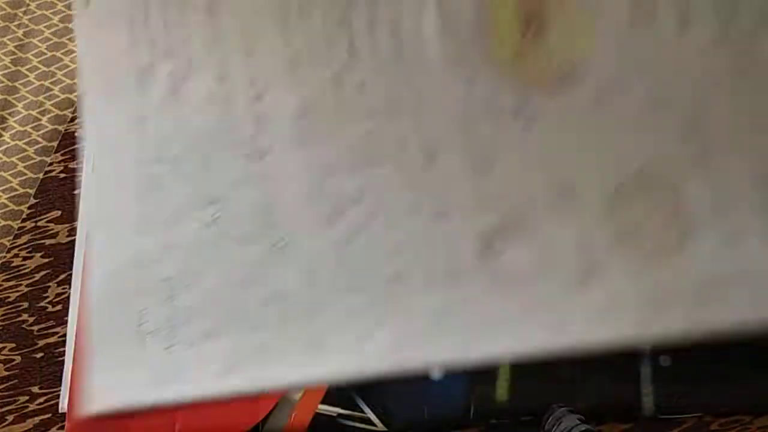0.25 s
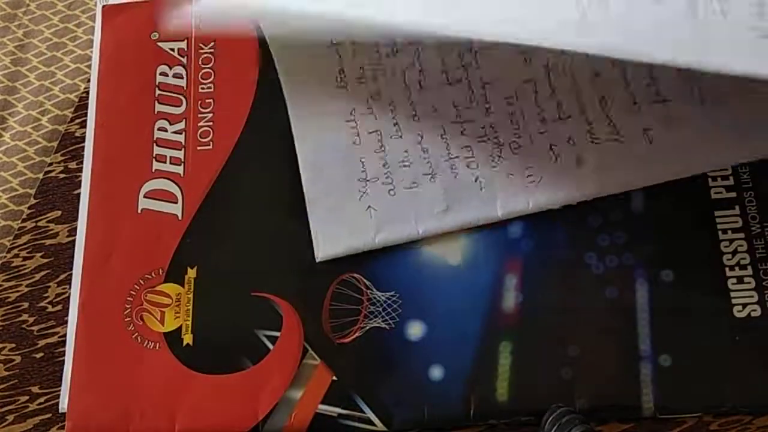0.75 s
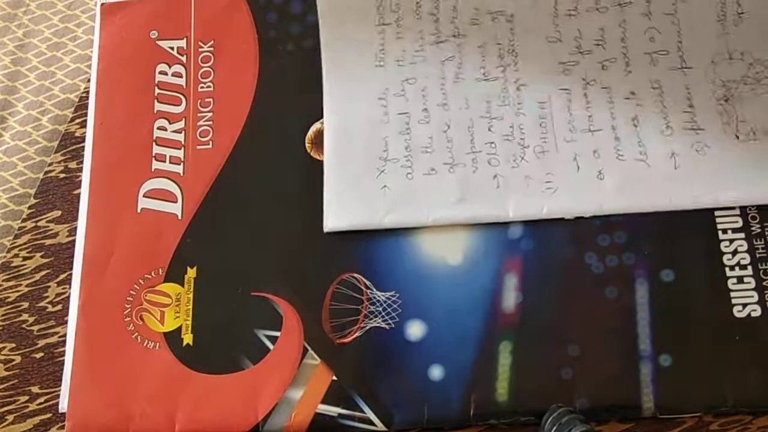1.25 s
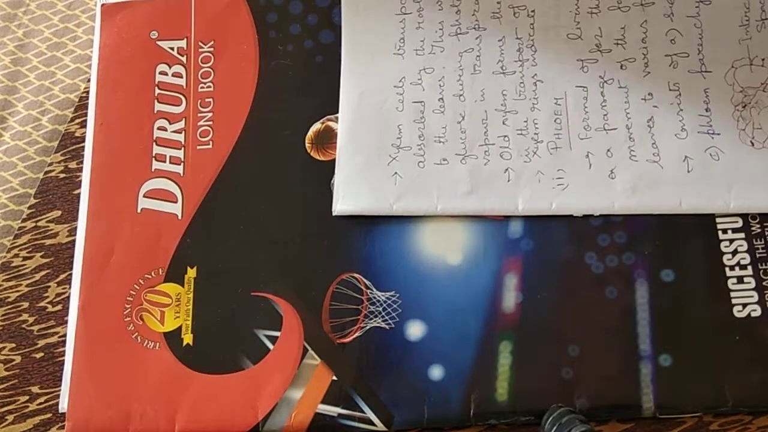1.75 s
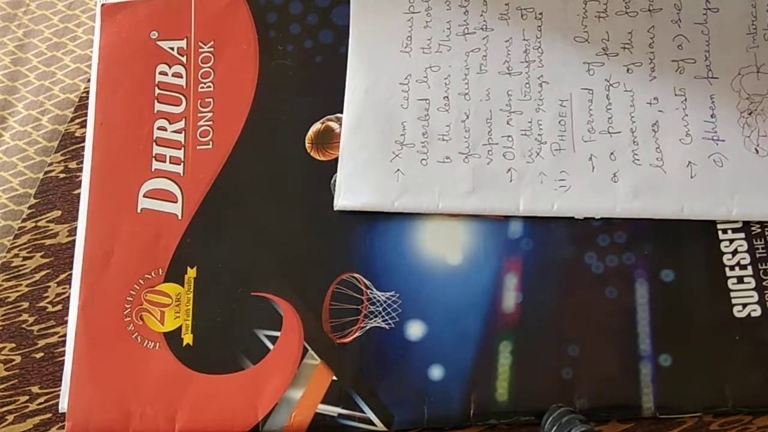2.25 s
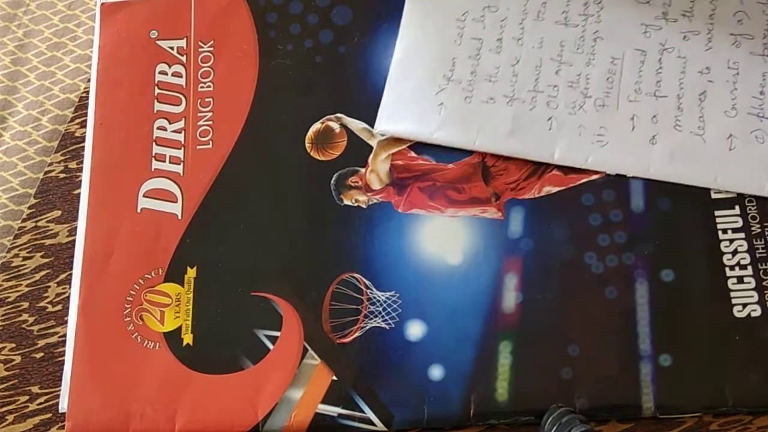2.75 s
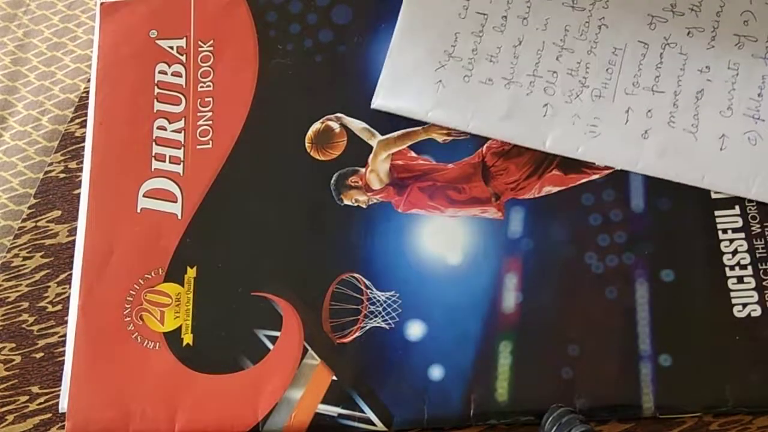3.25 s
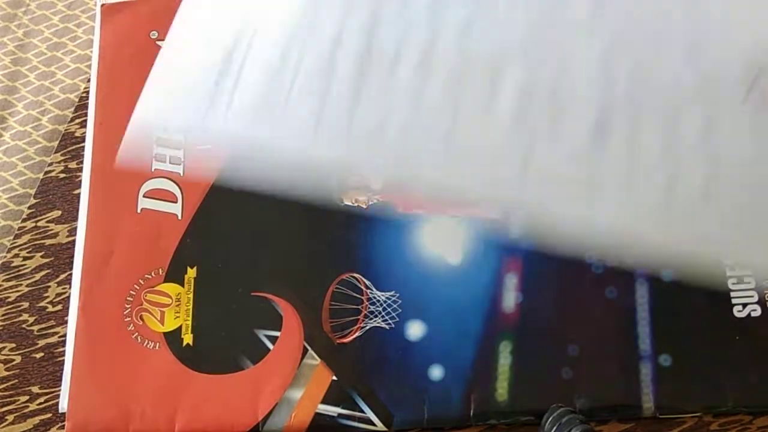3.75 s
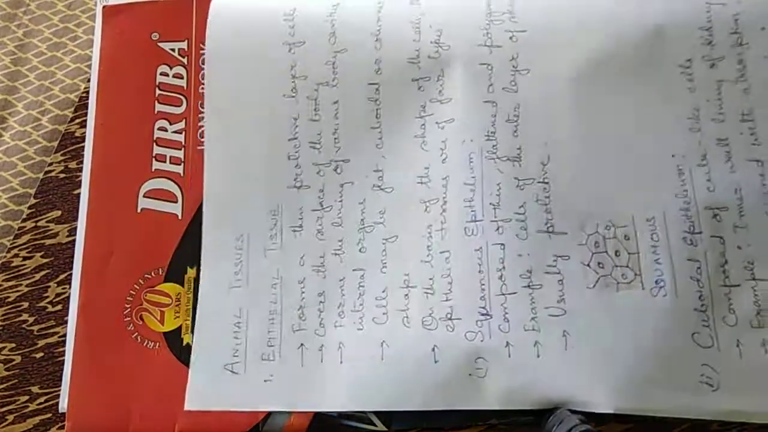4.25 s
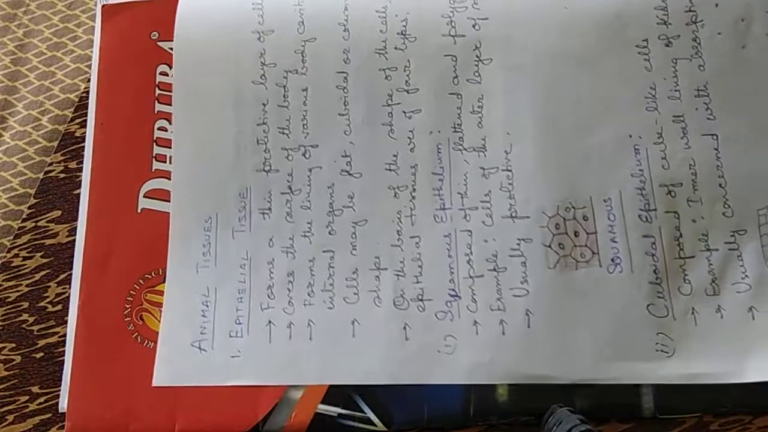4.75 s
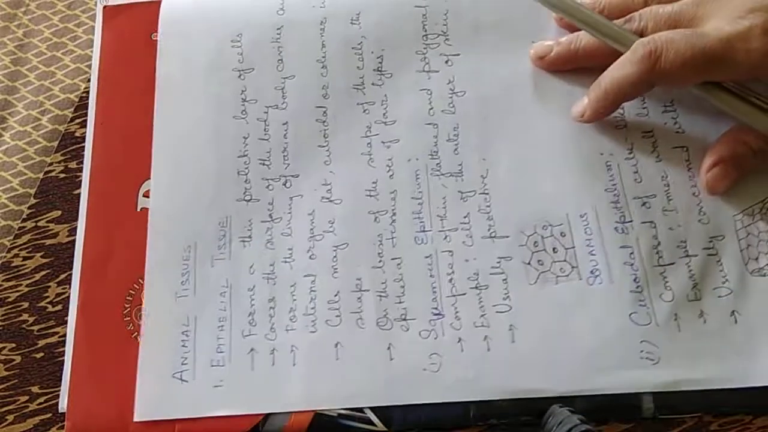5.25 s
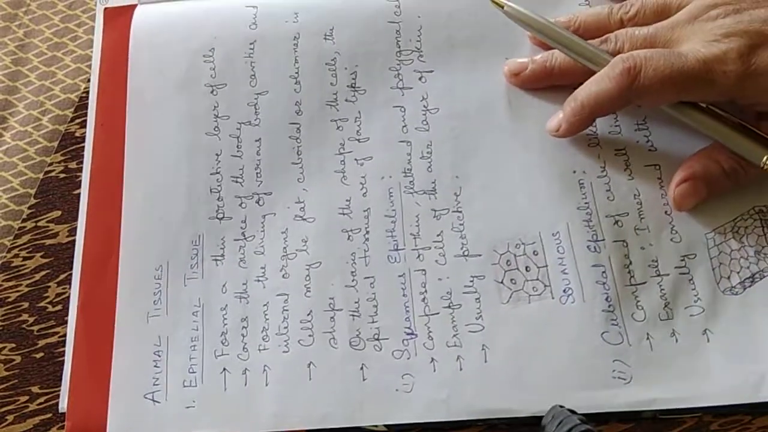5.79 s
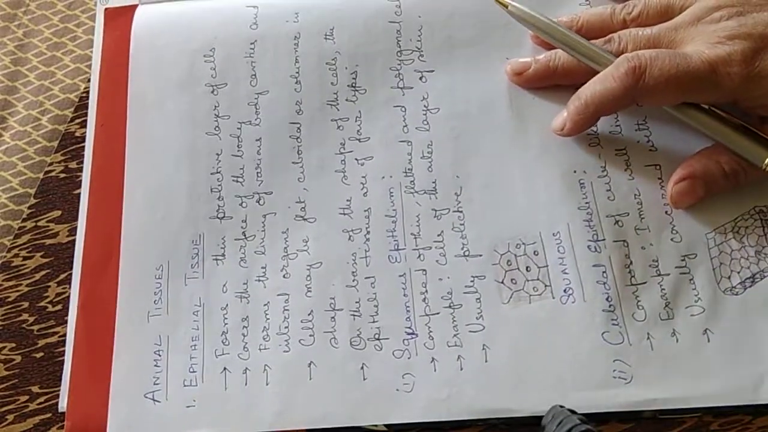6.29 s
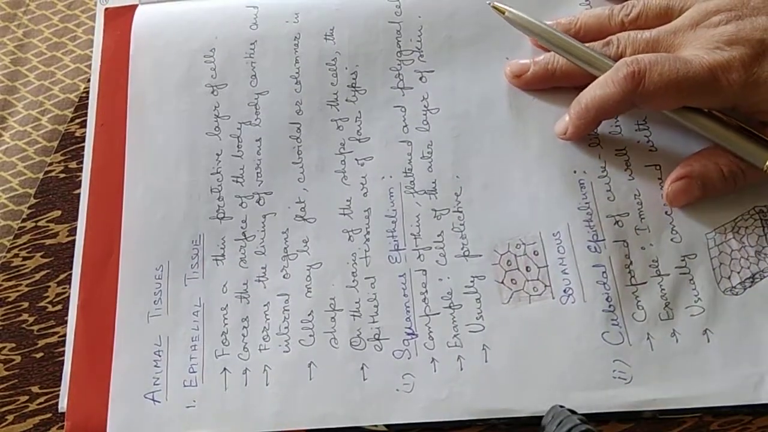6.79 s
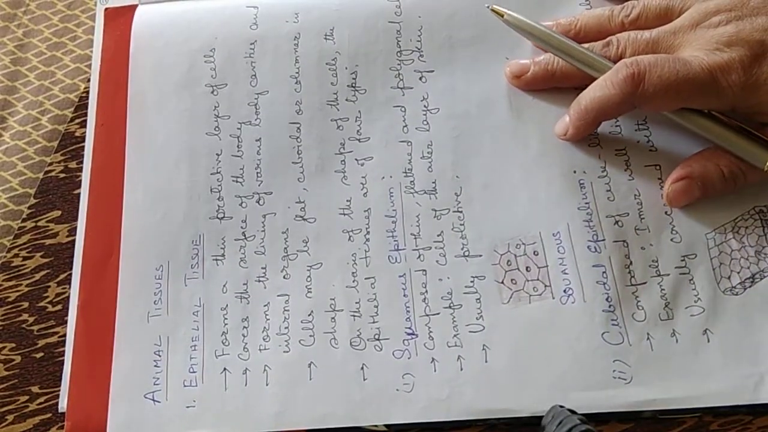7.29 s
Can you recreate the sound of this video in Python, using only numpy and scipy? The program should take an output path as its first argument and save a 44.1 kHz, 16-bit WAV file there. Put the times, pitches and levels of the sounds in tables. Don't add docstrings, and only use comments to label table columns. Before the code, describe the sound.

A small quiet room with a faint, steady low fan hum that thins toward the end, heard on a close stereo phone microphone. From 0 to 0.8 s a paper sheet swishes and scrapes, with small snaps and corner flicks. Between 0.8 and 1.6 s it flaps and pops dully on the notebook cover, then nearly rests until 2.4 s. A crease snaps at 2.5 s and a bright cluster of flicks bursts at 2.8 s. After lighter rustle, the sharpest cracks come at 3.4-3.7 s, followed by sweeping and soft pops to 4.4 s. A crisp flip at 4.56 s leads to smoothing slides around 5 s. A wooden tap at 5.57 s precedes rapid high pen ticks and a tiny squeak near 5.85 s. Soft rubbing continues; a stronger distant wood knock lands at 6.56 s, with lighter ones after. Around 7.1 s a thin metal clip shimmers faintly, then tiny ticks and low bumps finish by 7.5 s.

```python
import sys
import numpy as np
from scipy import signal
from scipy.fft import rfft, irfft, next_fast_len
from scipy.io import wavfile
from scipy.ndimage import uniform_filter1d, minimum_filter1d

SR = 44100
rng = np.random.default_rng(int(sys.argv[2]) if len(sys.argv) > 2 else 0)


def unload_wav(signal):
    wavfile.write(
        sys.argv[1],
        SR,
        np.round(np.clip(np.atleast_2d(signal).T, -1, 1) * 32767).astype(np.int16),
    )


def invert_db(x):
    u = np.asarray(x, float) / 20
    return 10 ** u


N = 332073
T = np.arange(N) / SR
PORT_LAG = 7
APART_HZ = 900


def level(x, db):
    return x * invert_db(db) / np.sqrt(np.mean(x ** 2) + 1e-30)


def colour(x, points):
    hz, db = np.transpose(points)
    size = next_fast_len(x.shape[-1])
    log_hz = np.log(np.arange(size // 2 + 1) * SR / size + 1)
    gain = invert_db(np.interp(log_hz, np.log(hz), db))
    return irfft(rfft(x, size) * gain, size)[..., :x.shape[-1]]


def band(x, lo_hz, hi_hz):
    sos = signal.butter(2, [lo_hz, min(hi_hz, .45 * SR)], "band", fs=SR, output="sos")
    return signal.sosfilt(sos, x)


def walk(rate):
    k = int(SR / rate)
    held = np.repeat(rng.standard_normal(N // k + 1), k)
    return 0.97 * uniform_filter1d(held, k)[:N]


def ports(alike, size):
    noise = rng.standard_normal((3, size))
    shared = np.array([noise[0], np.roll(noise[0], PORT_LAG)])
    return np.sqrt(alike) * shared + np.sqrt(1 - alike) * noise[1:]


def bass_alike(pair, hz):
    apart = np.clip(hz / APART_HZ, .3, 1)
    return np.array([pair[0], np.sqrt(1 - apart ** 2) * pair[0] + apart * pair[1]])


def sides(pan_db):
    return invert_db(np.array([[pan_db], [-pan_db]]) / 2)


def add(out, s, x):
    i = int(s * SR)
    out[:, i:i + x.shape[1]] += x[:, :N - i]


# pitch in Hz, time to fade by 60 dB in seconds.
ROOM_FADE = [(150, 0.43), (1000, 0.31), (4000, 0.25), (12000, 0.14)]


def room(x):
    first_wall_s = 0.00614
    t = np.arange(SR // 2) / SR
    hz, t60 = np.transpose(ROOM_FADE)
    tail = 0
    for f in 125 * 2. ** np.arange(8):
        octave = band(bass_alike(rng.standard_normal((2, len(t))), f), f / 1.41, f * 1.426)
        tail = tail + octave * invert_db(-60 * t / np.interp(np.log(f), np.log(hz), t60))
    tail = tail * np.clip((t - first_wall_s) / 0.00057, 0, 1)
    tail = tail / np.sqrt(np.sum(tail ** 2) / 2)
    return signal.fftconvolve(x, tail, axes=1)[:, :N]


# pitch in Hz, strength in dB per Hz.
FAN_TONE = [(15, -71), (25, -31), (69, -26.5), (83, -29.5), (105, -8.5), (168, -5), (220, -1.5),
            (366, -13.5), (425, -15), (472, -22.5), (697, -58.5), (900, -26), (1170, -47), (1980, -120)]
# time in seconds, level in dB.
FAN_LOUDNESS = [(0.0, -47), (0.55, -49), (1.42, -50), (1.82, -50), (2.24, -50.5), (2.58, -51), (2.95, -51),
                (3.4, -52.5), (3.75, -53), (3.92, -53.5), (5.26, -54.5), (5.51, -56.5), (5.64, -60.5),
                (6.77, -52), (7.07, -58), (7.32, -63), (7.53, -63)]


def fan():
    air = ports(0.95, N)
    hum = level(colour(air, FAN_TONE), -4.0) + level(band(air, 212.5, 237.6), -11.5)
    hum_db = np.interp(T, *np.transpose(FAN_LOUDNESS)) + 0.26 * walk(25)
    return hum * invert_db(hum_db) * sides(-0.84)


def ring(modes, seconds):
    swell_cycles = 2.2
    t = np.arange(int(seconds * SR)) / SR
    total = 0
    for hz, db, t60 in modes:
        phase = 0.2 * bass_alike(rng.standard_normal((2, 1)), hz)
        swell = 1.25 - np.exp(-t * hz / swell_cycles)
        total = total + invert_db(db - 60 * t / t60) * swell * np.sin(2 * np.pi * (hz * t + phase))
    return total


# pitch in Hz, level in dB, time to fade by 60 dB in seconds.
SHELF_RING = [(350, -0.5, 0.089), (534, -13, 0.22), (750, -9, 0.18), (876, -8, 0.082), (1030, -2, 0.066),
              (1144, -6.5, 0.36), (1390, 8, 0.033), (1532, 3, 0.056), (1459, 0.5, 0.14), (1740, -13, 0.17),
              (1680, 3.5, 0.088)]
CHEST_RING = [(237, -9, .22), (328, -1, .24), (442, -3, .3), (531, -12, .2), (608, -15, .25),
              (770, -8, .19), (920, -13, .15), (1058, -3, .17), (1228, -5, .17), (1455, -5, .13),
              (1595, -2, .13), (1826, -4, .14), (2480, -8, .07), (2740, -11, .15), (3128, -9, .15)]
LID_RING = [(940, -8, .12), (1211, -8, .15), (1340, -5, .05), (1536, -4, .2), (1653, -6, .18),
            (1980, -3, .04), (2300, -5, .05)]
# time in seconds, peak in dB, left minus right in dB.
FAR_KNOCKS = [
    (5.568, -26, 0.4),
    (6.561, -17.5, -0.24),
    (6.732, -31, -0.83),
    (6.642, -38.5, 0),
]


def knocks():
    woods = SHELF_RING, CHEST_RING, LID_RING, LID_RING
    cracks_db, tops_hz = (5.4, 8.0, 3.0, 4.5), (1900, 3400, 2600, 2100)
    out = np.zeros((2, N))
    for (s, db, pan_db), modes, crack_db, top_hz in zip(FAR_KNOCKS, woods, cracks_db, tops_hz):
        wood = ring([(hz, g, min(t60, .25)) for hz, g, t60 in modes], .5)
        t = np.arange(wood.shape[1]) / SR
        crack = band(rng.standard_normal(wood.shape), 810, top_hz) * invert_db(crack_db - 60 * t / 0.36)
        hit = band(band(wood + crack, 175, top_hz), 170, 6500)
        add(out, s + 0.0008, invert_db(db + 4.0) * hit / np.abs(hit).max() * sides(pan_db))
    return out


# time in seconds, peak in dB, pitch in Hz, time to fade by 60 dB in seconds.
SOFT_BUMPS = [
    (1.511, -51, 222, 0.08),
    (6.249, -42, 126, 0.14),
    (6.481, -46, 222, 0.091),
    (6.572, -38, 150, .12),
    (7.35, -35.5, 207, 0.03),
    (7.3952, -30.5, 170, 0.036),
]


def bumps():
    out, t = np.zeros((2, N)), np.arange(SR // 4) / SR
    for s, db, hz, t60 in SOFT_BUMPS:
        ease = np.sin(np.pi / 2 * np.clip(t * hz / 0.48, 0, 1)) ** 2
        note = invert_db(db - 1.0 - 60 * t / t60) * np.sin(2 * np.pi * hz * t) * ease
        add(out, s, np.ones((2, 1)) * band(note, 90, 900))
    return out


# start in seconds, end in seconds, pitch in Hz, width in Hz, level in dB.
RUBBED_NOTES = [
    (6.02, 6.17, 423, 22, -53),
    (5.9, 6.5, 440, 50, -62),
    (7.05, 7.3, 950, 500, -70),
    (6.882, 6.965, 338, 21, -43.5),
    (6.898, 7.035, 451, 23, -52),
    (7.428, 7.538, 350, 11, -64.5),
]
# start in seconds, end in seconds, pitch in Hz, width in Hz, level in dB.
HIGH_SQUEAKS = [
    (5.745, 5.785, 11700, 250, -53),
    (5.8355, 5.846, 11800, 600, -35),
    (5.842, 5.864, 11700, 400, -36),
    (5.86, 5.88, 11700, 700, -35),
    (5.875, 5.94, 11600, 400, -46),
]


def rubs():
    out = np.zeros((2, N))
    for start, end, hz, width_hz, db in RUBBED_NOTES + HIGH_SQUEAKS:
        size = int((end - start) * SR)
        noise = ports(0.87, size + SR // 4)
        note = band(noise, hz - width_hz / 2, hz + width_hz / 2)[:, -size:]
        add(out, start, level(note, db) * np.hanning(size) ** 0.4)
    return out


# pitch in Hz, width in Hz, level in dB.
CLIP_RING = [(6600, 40, -18), (7880, 27, -8), (9090, 35, -5), (9470, 40, -15), (10200, 34, -4),
             (11400, 36, -7), (12280, 97, -3), (12800, 60, -1), (14200, 500, 6), (15400, 250, -3)]


def metal():
    start_s, t60_s, clip_db = 7.111, 0.48, -52.5
    out, t = np.zeros((2, N)), np.arange(SR // 5) / SR
    noise = ports(0.41, SR // 2)
    tone = 0
    for hz, width, db in CLIP_RING:
        tone = tone + level(band(noise, hz - width / 2, hz + width / 2)[:, -len(t):], db)
    fade = np.clip(t / .012, 0, 1) * invert_db(-60 * t / t60_s) * np.clip((t[-1] - t) / .03, 0, 1)
    add(out, start_s, level(tone, clip_db) * fade)
    return out


def narrow_ticks(table, span):
    decay_s = 0.0013
    out, t = np.zeros((2, N)), np.arange(500) / SR
    for s, db, hz, pan_db in table:
        burst = ports(0.44, len(t)) * t / (t + 0.3 * decay_s) * np.exp(-t / decay_s)
        burst = band(band(burst, hz / span, hz * span), hz / span, hz * span)
        add(out, s, invert_db(db + 1.5) * burst / np.abs(burst).max(1).mean() * sides(pan_db))
    return out


# time in seconds, peak in dB, pitch in Hz, left minus right in dB.
PEN_TICKS = [
    (5.8363, -19.5, 11800, 6.5),
    (5.8382, -19, 11800, 7),
    (5.8432, -26, 11700, 7.5),
    (5.8625, -22, 11700, 9),
    (5.8645, -22, 11700, 7),
    (5.8672, -17, 11970, 5),
    (5.8705, -24, 11700, 4),
    (5.8725, -26, 12300, 6.5),
    (5.8752, -22.5, 12300, 5),
]


def pen():
    return narrow_ticks(PEN_TICKS, 1.05)


# time in seconds, peak in dB, pitch in Hz, left minus right in dB.
CORNER_PINGS = [(0.314, -27, 11950, 10), (.332, -33, 12500, 8), (.339, -29.5, 12500, 7),
                (.9381, -30, 12000, 4), (1.3539, -29, 13000, 3.5), (1.383, -40, 15000, 9),
                (2.737, -35.5, 14300, 7), (2.741, -31.5, 13800, 8), (2.746, -25, 13500, 6.5),
                (2.756, -29.5, 14600, 5.5), (2.7658, -22, 14500, 7), (2.7686, -22, 13000, 5.5),
                (2.771, -22.5, 11700, 3.5), (2.7755, -19.5, 12500, 7.5), (2.7792, -17, 14700, 7.5),
                (2.7835, -20.5, 13600, 7), (2.7925, -18, 14500, 9), (2.795, -15, 13500, 8.5),
                (2.797, -13.5, 14600, 9.5), (3.6443, -14.5, 12200, 5.5), (.687, -30, 4300, -10),
                (.755, -28.5, 3410, 1), (3.6548, -27, 4900, 1), (3.657, -27, 2900, -4),
                (4.084, -32.5, 1900, 2), (4.2963, -25, 2580, 3), (4.311, -34.5, 1900, 1),
                (4.316, -33, 2090, -2), (4.32, -35, 2200, 3), (7.3217, -36, 5940, 5),
                (4.701, -29, 11400, 2), (5.855, -34, 14300, 8.5), (5.868, -11, 13600, 6.5),
                (5.8684, -11.5, 10600, 6.5), (5.8905, -39, 6600, 3), (4.089, -34, 1150, 1),
                (.768, -36, 800, 3), (.777, -35.5, 900, 3), (7.317, -40, 6300, 5), (7.3295, -47, 5800, 3),
                (7.3432, -38, 5600, 6), (1.5045, -43, 7000, 3), (5.8844, -30.5, 12200, 5),
                (5.8894, -29.5, 13500, 6), (5.9381, -37, 12800, 5), (5.9423, -36.5, 13500, 8),
                (7.3035, -34.5, 12600, 2), (7.3064, -31, 12000, 4.5), (7.312, -40.5, 12500, 4),
                (7.317, -37.5, 12000, 4)]


def pings():
    return narrow_ticks(CORNER_PINGS, 1.146)


# time in seconds, edge in dB, thickness in dB, left minus right in dB.
EDGE_TICKS = [(0.229, -36.5, -13, 9.5), (0.4225, -18, -38, 12), (1.347, -29.5, -31, 9), (2.293, -31, -7, 0),
              (2.4646, -33, -11, 5), (2.6623, -31.5, -25, 1.5), (2.7424, -32, -10, 11.5),
              (2.7657, -25, -11.5, 10), (2.7985, -8, -20, 7.5), (.305, -24.5, -31, 2),
              (3.5808, -20.5, -14.5, -4.5), (3.647, -24, -15.5, 9), (5.537, -23, -34, -0.5),
              (5.836, -33, -14, 5), (5.867, -16, -18, 10.5), (.429, -25.5, -20, -6),
              (6.505, -30.5, -19, -6), (6.754, -25, -29, 5.5), (6.8896, -31, -17, -16.5),
              (7.3804, -31.5, -29, 2.5)]
# time in seconds, edge,
# crisp part and body in dB, left minus right in dB.
CREASE_FLIPS = [(.612, -23.5, -25.5, -28.5, -0.5), (0.6833, -27, -25, -39, 6.5),
                (0.6878, -34.5, -34, -34, 2), (.756, -36.5, -34, -39, 4), (2.4997, -13, -22, -40, 3),
                (2.44, -47, -47, -44.5, 0.5), (3.435, -16, -17.5, -30, 4), (3.446, -19, -33.5, -49, 2.5),
                (3.4867, -7.5, -17, -24, 7), (3.4897, -13, -16, -36, -4.5), (3.5214, -2.5, -12.5, -27, -1),
                (3.6555, -22.5, -36.5, -41, -3.5), (3.914, -18.5, -19, -25.5, 1.5),
                (4.0817, -44, -24, -25.5, -2.5), (4.204, -43, -33.5, -36, 0), (4.284, -51, -43, -37.5, -1),
                (4.296, -46, -33.5, -44, 3), (4.347, -49.5, -35, -40, 1.5),
                (4.5572, -20, -17.5, -31.5, 1.5), (2.8024, -25.5, -21.5, -34.5, 6.5),
                (4.9437, -39.5, -43, -67, -3), (5.026, -19, -24.5, -47, 0.5),
                (4.9997, -26.5, -24, -36.5, -2), (6.563, -25.5, -25.5, -17.5, 2.5),
                (6.7333, -50, -41, -47, -1.5), (7.293, -35.5, -46, -64, 1.5), (7.304, -35.5, -46, -63, 4),
                (7.3212, -28.5, -30, -50, -1.5), (7.343, -33, -39, -72, -1)]
# time in seconds, body in dB, edge in dB, left minus right in dB.
SHEET_POPS = [(0.171, -38.5, -49, -1), (.196, -45, -55.5, 0), (0.8, -40, -35.5, 2.5), (0.9661, -27, -26, 0),
              (1.206, -25, -40, 0.5), (1.32, -40, -49, 2.5), (1.394, -23.5, -16.5, -2.5),
              (1.5217, -27.5, -29, 0), (1.5962, -31, -53, 0.5), (1.759, -49, -50.5, 7),
              (1.8788, -50, -70, -6), (3.219, -41.5, -43, 4), (3.183, -39.5, -49, 6.5),
              (3.413, -30, -30, 0), (3.452, -41, -35, 2), (3.562, -32, -40.5, 0.5),
              (3.9736, -32.5, -35, -1.5), (4.047, -31.5, -38, 3.5), (4.146, -24.5, -35.5, 2),
              (5.928, -41.5, -55.5, -1), (5.934, -45, -55, 0), (7.07, -45, -65, -1), (6.873, -41, -60, 6),
              (6.965, -40, -60, 0), (7.402, -46, -65, 2), (6.632, -44, -31.5, 8)]


def burst(alike, decay_s):
    t = np.arange(800) / SR
    decay = np.exp(-t / decay_s) + .4 * np.exp(-t / (.3 * decay_s))
    return ports(alike, len(t)) * t / (t + .25 * decay_s) * decay


def snap(out, s, edge_db, crisp_db, body_db, hz, decay_s, pan_db):
    hz = hz * (1 + 0.028 * rng.standard_normal())
    top = burst(.3, 1.1 * decay_s)
    edge = band(top, 7100, 16100) + 1.1 * band(top, hz / 1.2, hz * 1.26)
    crisp = band(burst(.3, 1.2 * decay_s), 2900, 6050)
    body = band(burst(.8, 1.25 * decay_s), 410, 2110)
    total = 0
    for part, db in ((edge, edge_db + 2.0), (crisp, crisp_db + 0.5), (body, body_db + 3.0)):
        total = total + invert_db(db) * 1.22 * part / np.abs(part).max(1).mean()
    add(out, s + .0005, total * sides(pan_db))


def snaps():
    out = np.zeros((2, N))
    for s, edge_db, thick_db, pan_db in EDGE_TICKS:
        crisp_db = edge_db + thick_db
        snap(out, s, edge_db, crisp_db, crisp_db - 5.5, 11380, 0.00092, pan_db)
    for s, edge_db, crisp_db, body_db, pan_db in CREASE_FLIPS:
        snap(out, s, edge_db, crisp_db, body_db, 11130, 0.0012, pan_db)
    for s, body_db, edge_db, pan_db in SHEET_POPS:
        snap(out, s, edge_db, body_db - 7.5, body_db, 10600, 0.0012, pan_db)
    return out


# time in seconds, pressure in dB, rise and fall in seconds
# (each over 20 dB), slack in dB (how much the sheet flaps against the pressure).
SHEET_FLICKS = [(0.0, -35.5, 0.037, 0.052, -40), (.141, -43.5, 0.087, 0.13, -23),
                (0.801, -32.5, 0.18, 0.04, -9.5), (1.18, -37.5, 0.091, 0.13, -6.5),
                (1.41, -56, 0.032, 0.084, 13), (1.49, -44, 0.2, 0.071, -13), (1.54, -48.5, 0.12, 0.18, 1.5),
                (1.746, -52, 0.18, 0.097, -1.5), (2.19, -48, 0.092, 0.16, -3.5),
                (2.51, -40.5, 0.17, 0.28, -10.5), (2.6, -39, 0.25, 0.082, -7.5),
                (2.769, -29.5, .012, 0.13, -19), (2.797, -28, 0.066, 0.066, -15.5),
                (3.18, -44, 0.029, .5, -8), (3.235, -39, 0.066, 0.36, -18),
                (3.43, -34.5, 0.17, 0.28, -10.5), (3.49, -30.5, 0.22, 0.19, -19.5),
                (3.55, -52.5, 0.15, 0.44, 8), (3.64, -39, 0.037, 0.14, -1), (4.32, -50.5, 0.1, 0.13, 6.5),
                (4.563, -28, 0.072, 0.052, -7), (4.971, -37, 0.043, 0.18, -19),
                (5.01, -43, 0.066, 0.047, 3.5), (5.87, -39, 0.049, 0.052, -11),
                (5.84, -46.5, .008, .1, -10), (5.93, -55, .02, 0.086, 6.5), (6.75, -48.5, 0.12, 0.16, -0.5),
                (6.913, -39, 0.056, 0.12, -8), (7.302, -59.5, 0.031, 0.42, -3)]
# start in seconds, end in seconds, pressure in dB at the start,
# pressure in dB at the end, slack in dB.
COVER_DRAGS = [(0.037, .19, -51.5, -56, -14.5), (0.315, 0.596, -40, -48.5, -12),
               (0.66, 0.69, -53.5, -49, 3), (0.82, 1.049, -43, -36.5, -10.5), (1.226, 1.357, -50, -64, -1),
               (1.897, 2.085, -72.5, -77, 10.5), (2.256, 2.447, -60.5, -49, -10.5),
               (2.66, 2.74, -55.5, -49, -8.5), (2.897, 2.962, -49, -50, -8.5), (3.0, 3.15, -55.5, -58, -6),
               (3.292, 3.402, -40, -46.5, -13.5), (3.626, 3.85, -37, -39.5, -10.5),
               (3.872, 4.024, -41.5, -36.5, -5.5), (4.108, 4.234, -56.5, -47.5, -1.5),
               (4.35, 4.486, -46.5, -47, -6.5), (4.638, 4.789, -45.5, -47, -9.5),
               (5.044, 5.242, -42, -49.5, -20), (5.245, 5.565, -48.5, -41, -17.5),
               (5.666, 5.827, -61, -59, -7.5), (5.91, 6.118, -55.5, -52.5, -6.5),
               (6.187, 6.356, -59, -53, -0.5), (6.342, 6.505, -50, -57.5, -2), (6.54, 6.71, -50, -57, -3.5),
               (7.137, 7.257, -88, -87, 11), (7.398, 7.52, -59, -72, -5)]


def hand():
    drag_rise_s, drag_fall_s = 0.24, 0.13
    strokes = [(s, s + 0.00091, db, db, rise, fall, slack) for s, db, rise, fall, slack in SHEET_FLICKS]
    for s, end, db, end_db, slack in COVER_DRAGS:
        strokes.append((s, end, db, end_db, drag_rise_s, drag_fall_s, slack))
    pressure_db = flap_db = np.full(N, -120.)
    for s, end, db, end_db, rise, fall, slack in strokes:
        times = [s - 4 * rise, s, end, end + 4 * fall]
        stroke_db = np.interp(T, times, [db - 80, db, end_db, end_db - 80])
        pressure_db = np.maximum(pressure_db, stroke_db)
        flap_db = np.maximum(flap_db, stroke_db + slack)
    return pressure_db, flap_db


def grains(patchy_db, rate, alike):
    return ports(alike, N) * invert_db(patchy_db * walk(rate) + 1.84 * walk(rate / 8))


def crackle(lo_hz, hi_hz):
    per_s, spread_db, decay_s = 160, 3.0, .0012
    hits = (rng.random(N) < per_s / SR) * invert_db(spread_db * rng.exponential(size=N))
    bursts = signal.lfilter([1], [1, -np.exp(-1 / (decay_s * SR))], hits)
    return band(ports(0.49, N) * bursts, lo_hz, hi_hz)


# pitch in Hz, strength in dB per Hz.
SCRAPE_TONE = [(1200, -48), (2940, -31), (5000, -12), (6820, -6), (7350, -5), (12200, 2), (15900, -5),
               (16300, -26.5), (16500, -56.5)]
# time in seconds, level in dB against the flap.
COVER_LEVEL = [(0, -7.5), (.8, -0.5), (1.75, -2.5), (2.0, -6), (2.35, -10), (2.55, -3.5), (3.05, -9),
               (3.35, -7), (3.5, -4), (3.85, 0), (4.0, -13.5), (4.3, -9), (4.6, -25.5), (4.75, -30),
               (4.92, -36), (5.05, -4), (5.3, -49.5), (5.65, 7), (5.8, -11), (5.95, 1), (6.5, 3),
               (6.73, -3), (6.9, 5.5), (7.1, 10.5), (7.25, 2.5), (7.53, -13)]
# pitch in Hz, gain in dB.
COVER_HOLLOW = [(430, 0), (620, -3.5), (860, -1)]


def sheet():
    pressure_db, flap_db = hand()
    cover_db = flap_db + np.interp(T, *np.transpose(COVER_LEVEL))
    bending = np.hypot(invert_db(pressure_db - 11.5), invert_db(1.12 * (flap_db + 50) - 51 - 2.5))

    scrape = level(colour(grains(1.67, 420, 0.05), SCRAPE_TONE), 0)
    bend = level(band(grains(1.6, 300, 0.21), 2510, 5330), -2.38)
    bend = bend + level(crackle(2200, 6500), -6.5)
    flap = level(band(band(grains(4.8, 160, 0.41), 895, 2770), 895, 2770), -2.94)
    flap = flap + level(crackle(760, 3000), -10.5)
    cover = level(band(band(grains(5.0, 90, 0.93), 310, 1200), 310, 1200), -1.6)

    low = colour(flap, [(650, -9), (950, 0.5)]) * invert_db(flap_db) + cover * invert_db(cover_db)
    low = colour(low, COVER_HOLLOW)
    return (scrape * invert_db(pressure_db) + bend * bending + low) * sides(0.55)


def scene():
    paper = sheet()
    cracks = snaps() + pings() + pen()
    wood = knocks() + bumps()
    wet = room(invert_db(-6.5) * paper + invert_db(-9.0) * cracks + invert_db(-11.0) * wood)
    return invert_db(1.5) * paper + cracks + wood + wet + rubs() + metal() + fan()


def mute_patches(x, share, deep_db):
    hz, s, z = signal.stft(x, SR, nperseg=1024)
    luck = uniform_filter1d(rng.standard_normal((len(hz) // 7 + 1, len(s))), 7, axis=1)
    luck = np.repeat(luck / luck.std(), 7, axis=0)[:len(hz)]
    odds = share * np.interp(hz, [1780, 3350, 8100, 11600], [0.01, 0.95, 0.98, 0.3])[:, None]
    treble_db = 10 * np.log10(np.mean(np.abs(z[0, len(hz) // 8:]) ** 2, axis=0) + 1e-20)
    odds = odds * np.interp(treble_db - np.median(treble_db), [-25, -8], [1.8, .9])
    slope = np.diff(x[0])
    peak = -minimum_filter1d(-np.abs(slope), 1500)
    crest_db = 20 * np.log10(peak / np.sqrt(uniform_filter1d(slope ** 2, 1500) + 1e-20) + 1e-9)
    odds = odds * (np.interp(s * SR, np.arange(N - 1), crest_db) < 19.5)
    rank = luck.ravel().argsort().argsort().reshape(luck.shape) / luck.size
    return signal.istft(z * np.where(rank < odds, invert_db(deep_db), 1), SR, nperseg=1024)[1][:, :N]


def mute_before_snaps(x, share, jump_db):
    hz, s, z = signal.stft(x, SR, nperseg=256)
    treble_db = 10 * np.log10(np.mean(np.abs(z[0, 16:]) ** 2, axis=0) + 1e-20)
    coming_db = -minimum_filter1d(-treble_db, 9, origin=-4)
    luck = rng.random((len(hz) // 5 + 1, len(s) // 3 + 1))
    luck = np.repeat(np.repeat(luck, 5, axis=0), 3, axis=1)[:len(hz), :len(s)]
    odds = share * np.interp(hz, [1800, 2800, 9500, 11000], [0, 1, 1, 0])[:, None]
    odds = odds * (coming_db - treble_db > jump_db)
    return signal.istft(z * np.where(luck < odds, .01, 1), SR, nperseg=256)[1][:, :N]


def band_limit(x):
    return signal.sosfilt(signal.butter(12, 15800, fs=SR, output="sos"), x)


def record(dry):
    right = colour(dry[1], [(9000, 1), (12500, -5.5), (15500, -17.5)])
    patchy = mute_patches(np.array([dry[0], right]), share=.4, deep_db=-60)
    mix = np.tanh(mute_before_snaps(patchy, share=.35, jump_db=14))
    return band_limit(mix)


dry = scene()
out = record(dry)
unload_wav(out)
```